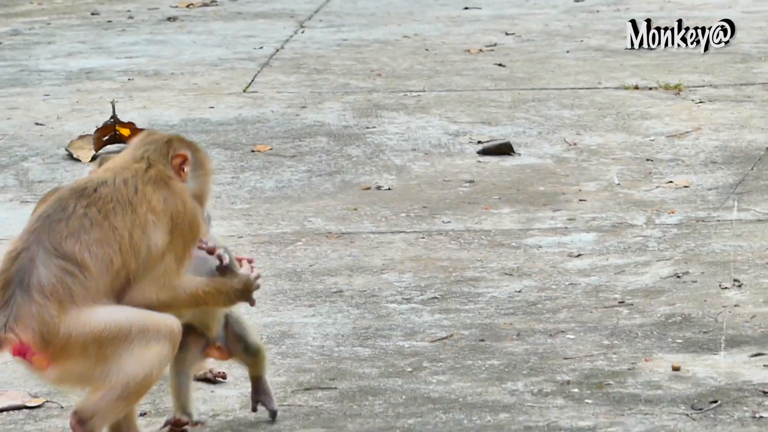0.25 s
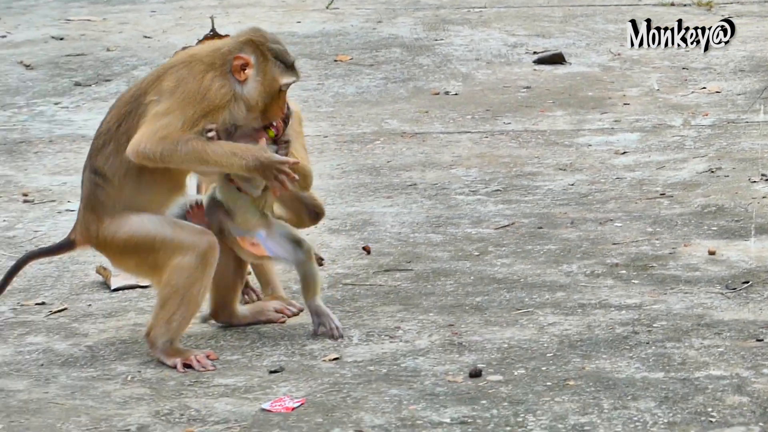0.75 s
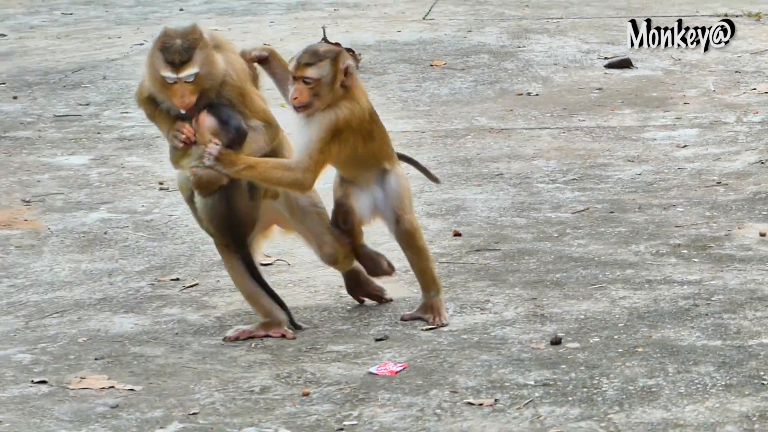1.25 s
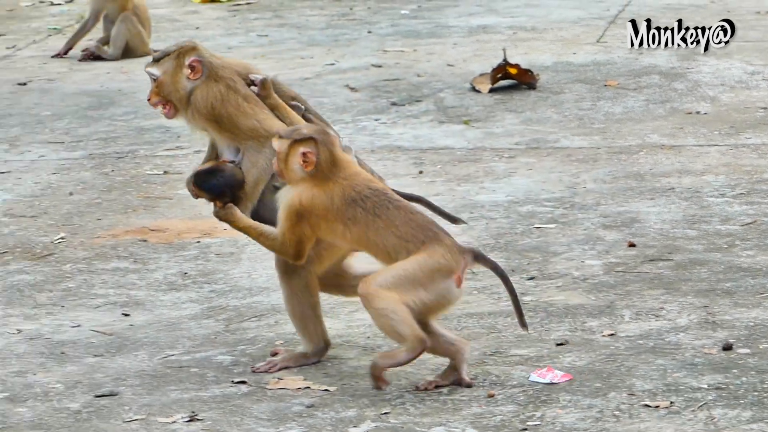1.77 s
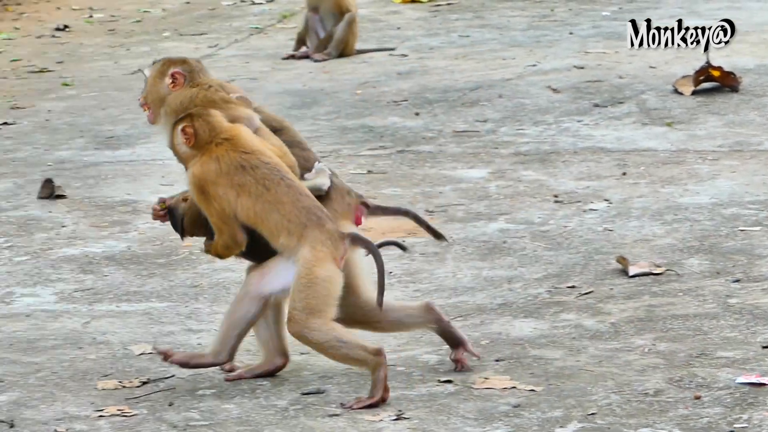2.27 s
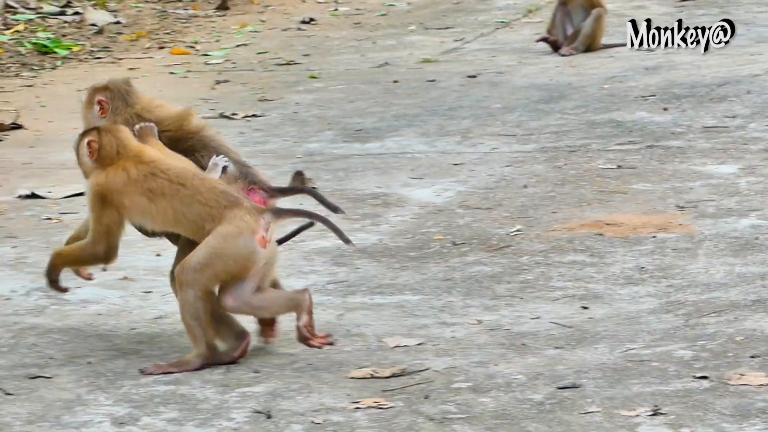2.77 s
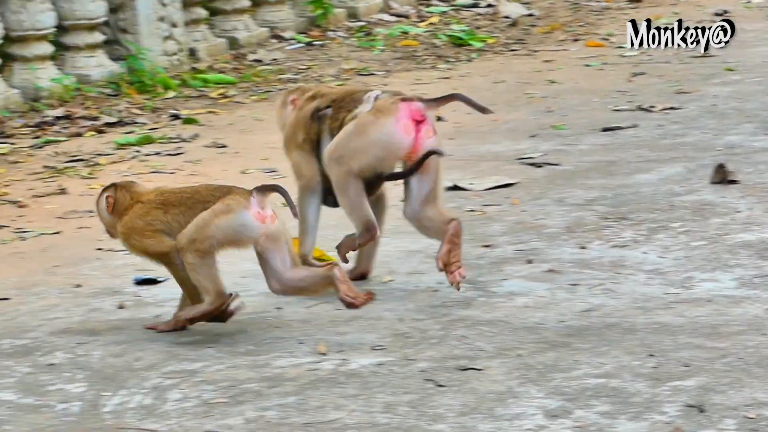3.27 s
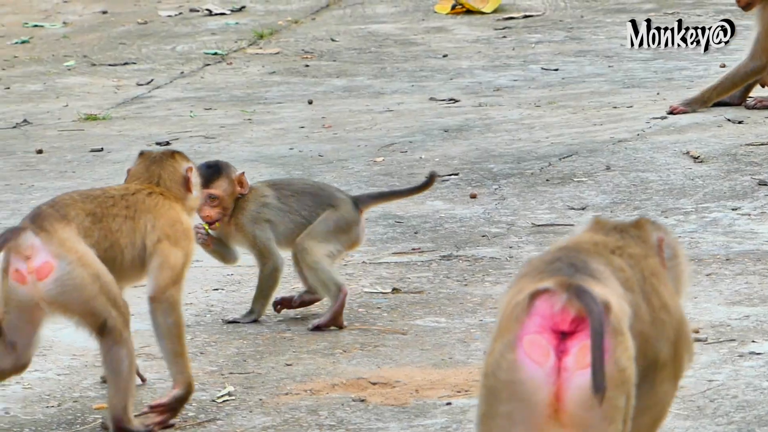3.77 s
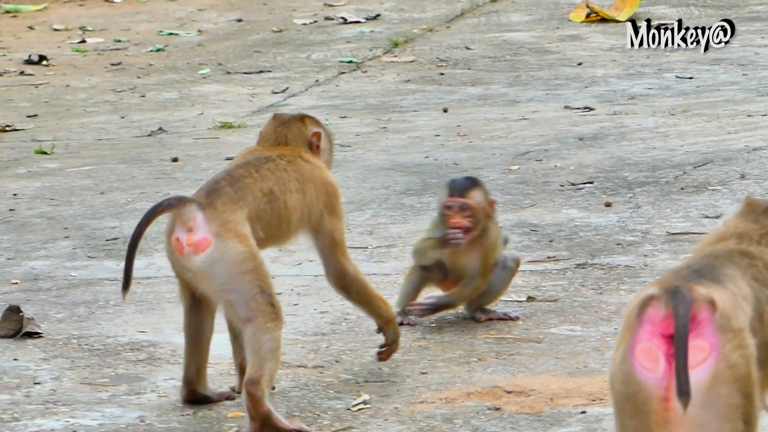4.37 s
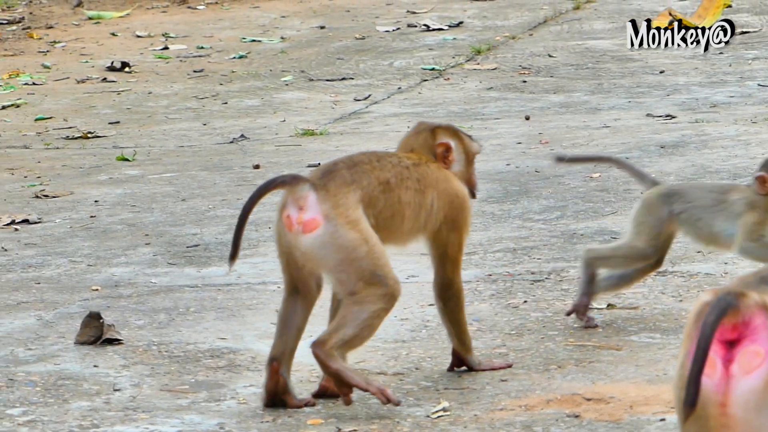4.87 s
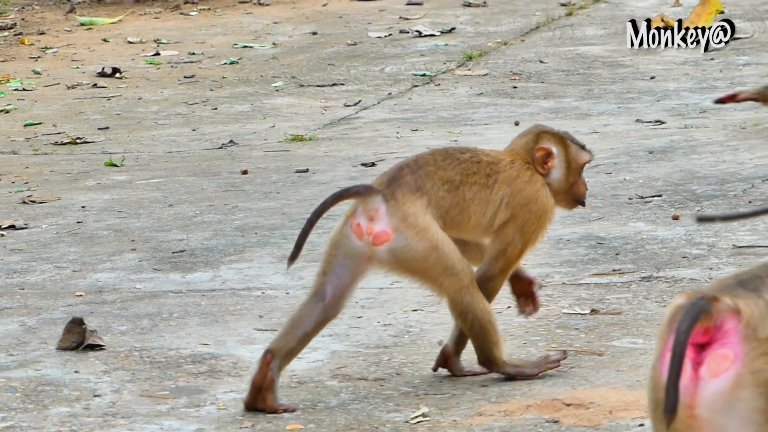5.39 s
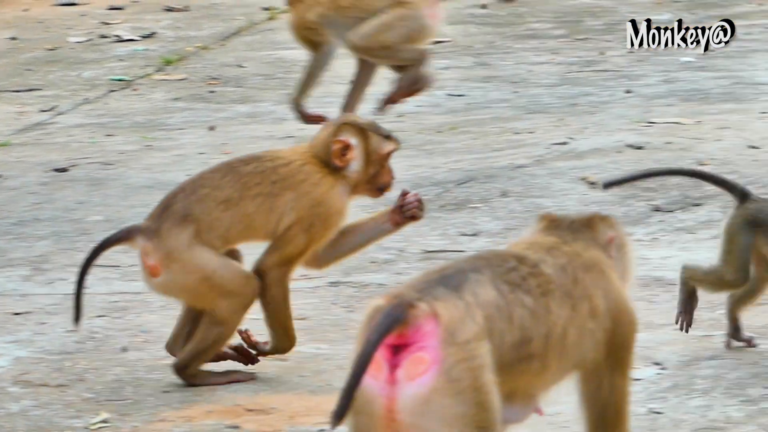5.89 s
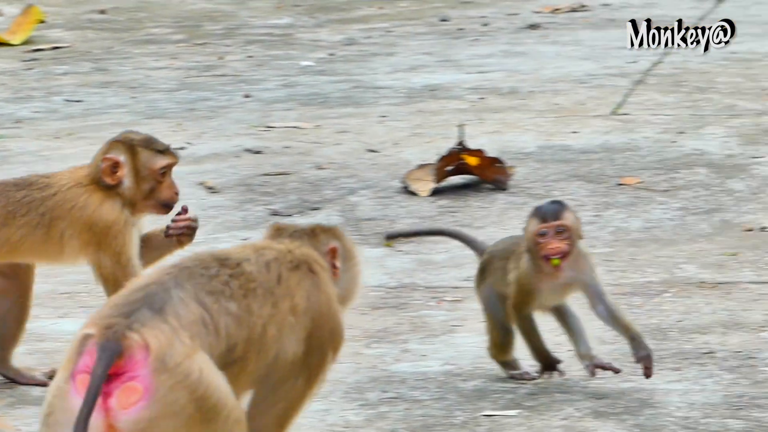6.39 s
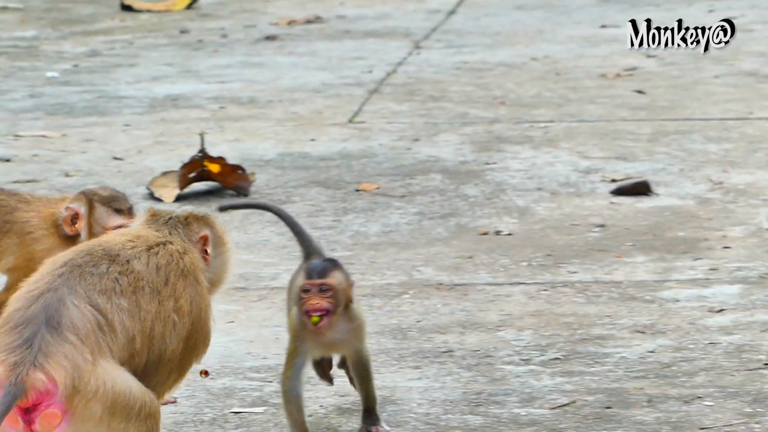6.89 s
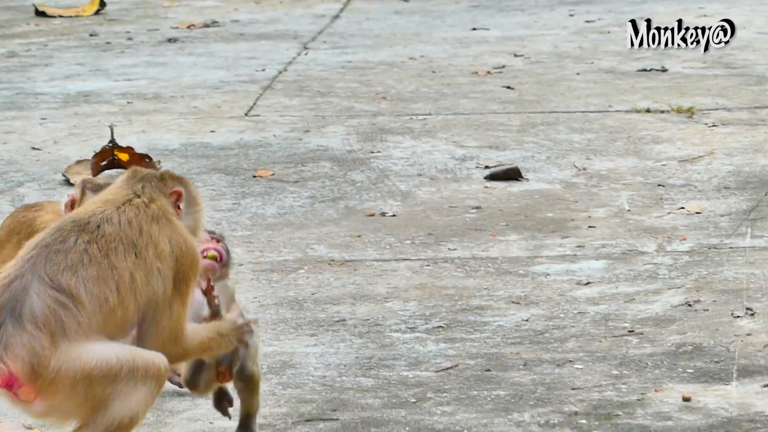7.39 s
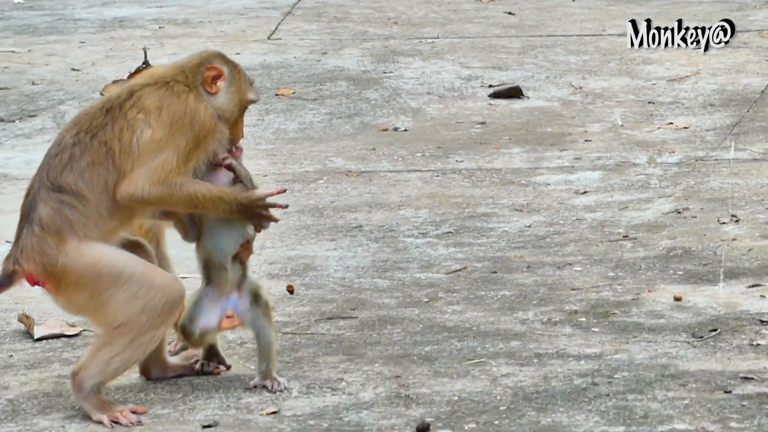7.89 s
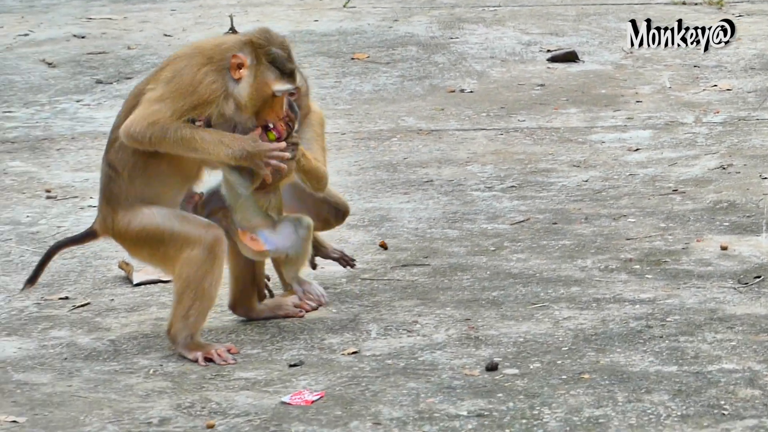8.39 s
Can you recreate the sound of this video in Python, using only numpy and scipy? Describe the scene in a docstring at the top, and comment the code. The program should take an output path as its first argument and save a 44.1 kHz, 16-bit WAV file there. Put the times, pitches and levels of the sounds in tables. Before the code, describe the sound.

Outdoors on concrete, dull thumps knock the microphone as a baby monkey gives a loud, breaking, falling scream, then three more short shrill cries and a faint distant one. Light gritty scuffs follow over low rumble and motor hum. A sudden cut brings quieter, slowed sound a fifth lower: three clean whistled squeals, then the bumps and rough screams again, stretched.

```python
"""A baby macaque screams on a concrete yard as older monkeys grab it and run off: vocal-fold partials lose
their regularity, are filtered by throat and mouth, bounce off the ground and reverberate in the yard.
Feet scuff as bursts of filtered noise, bumps rock the microphone as short damped tones, and a far motor
hums as wavering sines over noise. The action plays at true speed, then slowed and quieter from an earlier
start, so three clean squeals from before the grab are heard only in the slow replay."""
import sys
import numpy as np
from scipy import signal
from scipy.fft import rfft, irfft, next_fast_len
from scipy.io import wavfile
from scipy.ndimage import uniform_filter1d

SR = 44100
rng = np.random.default_rng(int(sys.argv[2]) if len(sys.argv) > 2 else 0)


def output_pcm(signal):
    """Save a mono or channel-first signal as 16-bit PCM at the path in sys.argv[1].

    Samples are clipped to [-1, 1] before scaling.
    """
    pcm = np.clip(np.atleast_2d(signal).T, -1, 1) * 32767
    wavfile.write(sys.argv[1], SR, np.round(pcm).astype(np.int16))


N = 381461

CUT_S, LEAD_S = 3.54, 2.39983   # the replay begins at the cut; it shows this much earlier action
SLOWDOWN, REPLAY_DB = 1.5, -11.9
CUTOFF_HZ = 9600
TIME = np.arange(int((LEAD_S + CUT_S) * SR)) / SR - LEAD_S   # action clock [s]; the lead-in is negative


def from_db(db):
    """Level to amplitude ratio: 20 dB is a factor of ten."""
    return 10 ** (np.asarray(db) / 20)


def rms_one(x):
    """Normalization to unit mean-square power."""
    return x / np.sqrt(np.mean(x ** 2) + 1e-20)


def read_table(points, hz):
    """Linear interpolation on a logarithmic frequency axis."""
    f, value = np.transpose(points)
    return np.interp(np.log(hz + 1e-9), np.log(f), value)


def colour(x, spectrum):
    """Linear filtering: a spectrum is multiplied by a gain that falls a further 20 dB/octave past its ends."""
    size = next_fast_len(x.shape[-1] + 1024)
    hz = np.maximum(np.arange(size // 2 + 1) * SR / size, 1)
    octaves_outside = np.abs(np.log2(hz / np.clip(hz, spectrum[0][0], spectrum[-1][0])))
    gain = from_db(read_table(spectrum, hz) - 20 * octaves_outside)
    return irfft(rfft(x, size) * gain, size)[..., :x.shape[-1]]


def wobble(hz, size):
    """Band-limited random modulation: low-passed Gaussian noise of unit spread."""
    spectrum = rfft(rng.standard_normal(next_fast_len(size + SR // 4)))
    f = np.linspace(0, SR / 2, len(spectrum))
    return rms_one(irfft(spectrum / (1 + (f / hz) ** 6)))[:size]


# Interchannel correlation of a diffuse field: (frequency [Hz], correlation [-1 to 1])
CHANNEL_CORRELATION = [(50, 0.93), (150, 0.76), (300, 0.5), (800, 0.35), (2000, 0.7), (3500, 0.88),
                       (8000, 0.2)]


def stereo_noise(size):
    """Diffuse field: shared and opposed noise are weighted to set the interchannel correlation."""
    padded = next_fast_len(size)
    mid, side = rfft(rng.standard_normal((2, padded)))
    alike = np.clip(read_table(CHANNEL_CORRELATION, np.linspace(0, SR / 2, len(mid))), -1, 1)
    shared = np.sqrt(1 + alike) * mid
    opposed = np.sqrt(1 - alike) * side * [[1], [-1]]
    return irfft(shared + opposed, padded)[:, :size] / np.sqrt(2)


def add(track, sound, s):
    """Superposition: sound pressures sum, here from a given action time."""
    start = max(int((s + LEAD_S) * SR), 0)
    track[:, start:start + sound.shape[-1]] += sound[..., :max(track.shape[1] - start, 0)]


def action_time(replay_s):
    """Time scaling: the moment of the action that sounds at a time of the replay."""
    return (replay_s - CUT_S) / SLOWDOWN - LEAD_S


def low_pass(x):
    """Band limitation by a steep elliptic filter."""
    return signal.sosfilt(signal.ellip(12, .1, 80, CUTOFF_HZ, fs=SR, output="sos"), x)


# Noise spectra of low rumble, drone and outdoor hiss: (frequency [Hz], relative level [dB])
RUMBLE_SPECTRUM = [(15, -53.5), (25, -21), (44, -5), (81, 1), (150, -1), (182, 0), (252, -5.5),
                   (330, -12.5), (430, -35), (730, -120)]
DRONE_SPECTRUM = [(140, -30.5), (230, -14), (308, -1.5), (470, 0), (796, -12), (914, -11), (1060, -18),
                  (1600, -31), (2080, -60.5), (3520, -120)]
AIR_SPECTRUM = [(700, 5.5), (1300, 4.5), (2500, 0.5), (4000, -2.5), (5200, -6.5), (6600, -3), (7700, -7.5),
                (9500, -15)]
# Tonal lines of the far motor: (frequency [Hz], RMS level before panning [dB])
MOTOR_LINES = [(78, -59.5), (138, -61), (177.6, -55.5)]
# Rumble swells while the microphone is jostled: (middle [s], width [s], gain [dB])
JOSTLE_SWELLS = [(0.021, 0.13, 13.5), (3.4, 0.052, 1)]
RUMBLE_DB, DRONE_DB = -47, -53
# One lull: the noise drops at once and creeps back.
LULL_REPLAY_S, RECOVERY_S = 6.1, 1.6   # onset on the replay clock; decay time on the action clock
RUMBLE_DIP_DB, DRONE_DIP_DB = 5, 9


def background(air_db=-57.0, air_dip_db=3, hum_waver=.014, rumble_pan_db=0.1, motor_pan_db=2):
    """Tones in noise: frequency-modulated motor lines over coloured noise that sinks in an exponential lull."""
    size, since = len(TIME), TIME - action_time(LULL_REPLAY_S)
    lull = np.clip(since / 0.014, 0, 1) * np.exp(-np.maximum(since, 0) / RECOVERY_S)
    jostle_db = sum(db * np.exp(-((TIME - s) / width) ** 2) for s, width, db in JOSTLE_SWELLS)
    rumble_db = RUMBLE_DB - RUMBLE_DIP_DB * lull + jostle_db
    rumble = rms_one(colour(stereo_noise(size), RUMBLE_SPECTRUM)) * from_db(rumble_db)
    drone = rms_one(colour(stereo_noise(size), DRONE_SPECTRUM)) * from_db(DRONE_DB - DRONE_DIP_DB * lull)
    air = rms_one(colour(stereo_noise(size), AIR_SPECTRUM)) * from_db(air_db - air_dip_db * lull)
    # one common speed, so that all motor lines waver together
    turned_s = np.cumsum(1 + hum_waver * wobble(10.4, size)) / SR
    hum = sum(np.sqrt(2) * from_db(db) * np.sin(2 * np.pi * hz * turned_s) for hz, db in MOTOR_LINES)
    rumble = rumble * from_db([[-rumble_pan_db], [rumble_pan_db]])
    motor = (drone + hum) * from_db([[-motor_pan_db], [motor_pan_db]])
    return rumble + motor + air


# Dull bumps on the microphone: (time of strongest swing [s], envelope peak before panning [dB], frequency [Hz])
MICROPHONE_BUMPS = [(0.004, -24.5, 135), (0.052, -35, 144), (0.078, -20, 111), (0.096, -20, 137),
                    (3.32, -36, 104), (3.349, -33.5, 135), (3.388, -39, 102), (3.456, -29, 104)]


def bumps(cycles=0.72, skew_rad=.45, pan_db=2.7):
    """Heavily damped oscillation: a bump rocks the microphone briefly, its two sides out of phase."""
    out, t, sides = np.zeros((2, len(TIME))), np.arange(SR // 8) / SR, np.array([[-1], [1]])
    for s, peak_db, hz in MICROPHONE_BUMPS:
        swell = t * hz / cycles   # reaches 1 at the envelope peak
        swing = np.sin(2 * np.pi * hz * t + rng.uniform(0, 2 * np.pi) + skew_rad * sides)
        thud = swing * swell ** 2 * np.exp(1 - swell ** 2)
        add(out, thud * from_db(peak_db + pan_db * sides), s - cycles / hz)
    return out


# Feet and hands on gritty concrete: (time [s], level [dB], decay time [s], spectral peak [Hz])
GRIT_SCUFFS = [(1.696, -50, 0.015, 5500), (1.711, -52.5, .015, 5450), (2.442, -40, 0.0046, 1530),
               (2.447, -52, 0.016, 5450), (2.917, -53, 0.019, 800), (2.99, -48, 0.041, 5630),
               (3.143, -49.5, 0.011, 2200), (3.193, -53.5, 0.064, 5200), (3.46, -56, 0.025, 5000)]


def scuffs(grain_db=3, attack_s=0.00082, skirt_db=-12):
    """Friction noise: grit gives decaying bursts of granular noise, dull for a slap, bright for a slide."""
    out, t = np.zeros((2, len(TIME))), np.arange(SR // 5) / SR
    for s, level_db, length, hz in GRIT_SCUFFS:
        grit = stereo_noise(len(t)) * from_db(grain_db * wobble(550, len(t)))
        grit = rms_one(colour(grit, [(hz / 3, skirt_db), (hz, 0), (hz * 3, skirt_db)]))
        burst = np.minimum(t / attack_s, 1) * np.exp(-t / max(length, .002))
        add(out, grit * from_db(level_db) * burst, s)
    return out


# Reverberation of the yard: (frequency [Hz], time to decay by 60 dB [s])
YARD_DECAY = [(500, 0.33), (2500, 0.92), (5000, 0.96), (9000, 0.5)]
# Distinct far wall: (delay [s], level against the whole diffuse echo [dB])
WALL_ECHOES = [(0.17, -19)]


def yard_echo(first_s=0.0038, build_s=0.0087, early_db=5, early_s=0.027):
    """Reverberation: trees and buildings return a dense tail decaying band by band; a far wall adds an echo."""
    t, out = np.arange(SR) / SR, 0
    edges = np.geomspace(600, 11000, num=8)
    for low, high in zip(edges, edges[1:]):
        band_filter = signal.butter(2, [low, high], "band", fs=SR, output="sos")
        band = signal.sosfilt(band_filter, stereo_noise(SR))
        decay_s = read_table(YARD_DECAY, np.sqrt(low * high))
        out = out + band * np.exp(-np.log(1000) * t / decay_s)
    build_up = np.clip((t - first_s) / build_s, 0, 1)
    early_boost = 1 + from_db(early_db) * np.exp(-t / early_s)
    out = out * build_up * early_boost
    out = out / np.sqrt(np.sum(out ** 2))
    for delay, db in WALL_ECHOES:
        out[:, int(delay * SR)] += from_db(db)
    return out


def heard(voice, yard, echo_db, ground_ms, ground_db, pan_db=0.74):
    """Propagation by several paths: direct, ground and yard sound add; the ground path combs the spectrum."""
    n = np.arange(len(voice))
    # the comb makes a call swell and dip as its pitch moves
    bounce = np.interp(n - ground_ms * SR / 1000, n, voice, left=0)
    direct = voice + from_db(ground_db) * bounce
    out = from_db(echo_db) * signal.fftconvolve(yard, voice[None], axes=1)
    return out + np.pad(direct, (0, out.shape[1] - len(n))) * from_db([[-pan_db], [pan_db]])


def envelope(t, attack_s, release_s):
    """Amplitude envelope: quarter-sine attack, hold, linear release."""
    return np.sin(np.pi / 2 * np.clip(t / attack_s, 0, 1)) * np.clip((t[-1] - t) / release_s, 0, 1)


# Resonances of throat and open mouth: (frequency [Hz], gain [dB])
THROAT_RESPONSE = [(1050, -36.5), (1320, -12.5), (1600, 3), (2300, 1), (3000, 1), (3600, -2), (4050, -6),
                   (4800, -5.5), (5900, 1), (7400, -5), (8100, -6.5), (8600, -17), (9300, -15.5)]
# Partials of a four-cycle fold pattern: (multiple of the pitch [ratio], level before scaling [dB])
SUBHARMONICS = [(.5, -26.5), (.75, -5.5), (1.25, -2), (1.5, -2), (2.5, -9.5), (4.5, -14)]


def cry(pitch, chaos, quadrupling, octave_db, third_db, rasp_db, tremor,
        lurch=.04, smear_hz=170, flutter_db=4.0, uneven_db=4.0):
    """Source-filter voice: harmonics, four-cycle subharmonics and chaos excite the throat; level is evened."""
    chaos, size = np.clip(chaos, 0, 1), len(pitch)
    unsteady_pitch = pitch * (1 + (tremor + lurch * chaos) * wobble(150, size))
    phase = 2 * np.pi * np.cumsum(unsteady_pitch) / SR
    harmonics, folds = {1: 1, 2: from_db(octave_db), 3: from_db(third_db)}, 0
    for multiple in np.arange(2, 19) / 4:
        if multiple in harmonics:
            strength = harmonics[multiple]
        else:
            partial_db = read_table(SUBHARMONICS, multiple) + uneven_db * wobble(23, size)
            strength = quadrupling * from_db(partial_db)
        # in chaos every partial strays from its place and flutters by itself
        stray_hz = smear_hz * np.sqrt(multiple) * chaos * wobble(300, size)
        stray = 2 * np.pi * np.cumsum(stray_hz) / SR
        flutter = from_db(flutter_db * chaos * wobble(250, size))
        folds = folds + strength * flutter * np.cos(multiple * phase + stray)
    # air torn up once a cycle adds a thin hiss above the pitch
    hiss = colour(rng.standard_normal(size), [(3300, -8.0), (5000, 5), (9500, -7.5)])
    rasp = rms_one(hiss) * (1 + 0.34 * np.cos(phase))
    voice = colour(folds + from_db(rasp_db) * np.sqrt(chaos) * rasp, THROAT_RESPONSE)
    return voice / np.sqrt(uniform_filter1d(voice ** 2, size=600) + 1e-12)


SQUEAL_CHAOS = .02   # 0-1, once opened
SQUEAL_RELEASE_S, GLIDE_S = .007, .009   # final fade; the pitch rounds its turns over the glide
PURE_ONSET_DB, OPENING_S = -11.5, .025   # overtone cut at either end; overtone and rasp open over this time


def squeal(contour, level_db, attack, sag, octave_db, rasp_db):
    """Near-periodic phonation: a held whistle whose overtone and rasp grow as it opens and fade as it ends."""
    s, hz = np.transpose(contour)
    s = (s - s[0]) / SLOWDOWN
    t = np.arange(0, s[-1] + SQUEAL_RELEASE_S / 2, 1 / SR)
    true_pitch = np.interp(t, s, hz * SLOWDOWN)
    pitch = uniform_filter1d(true_pitch, size=max(int(GLIDE_S * SR), 1), mode="nearest")
    opened = np.clip(np.minimum(t, t[-1] - t) / OPENING_S, 0, 1)
    overtone_db = octave_db + PURE_ONSET_DB * (1 - opened)
    voice = cry(pitch, SQUEAL_CHAOS * opened ** 2, 0, overtone_db, third_db=-22.5,
                rasp_db=rasp_db, tremor=.0065)
    return voice * from_db(level_db + sag * t) * envelope(t, attack, SQUEAL_RELEASE_S)


BREAK_S, RELEASE_S = .007, 0.033   # time for the folds to break up; final fade
PUSH_EARLY_S, PUSH_S = .009, .004   # the push to full strength: lead before the top; suddenness


def scream(length, level_db, soft_db, sag, rise, fall, onset_hz, top_hz, end_hz, chaos, quadrupling,
           shudder_db=1.3):
    """Nonlinear phonation: a soft rising whistle is pushed, breaks at its top and falls rough and shuddering."""
    t = np.arange(int(length * SR)) / SR
    past_top = np.maximum(t - rise, 0)
    climb = np.sin(np.pi / 2 * np.clip(t / rise, 0, 1)) ** 2
    slide = np.sin(np.pi / 2 * np.clip(past_top / fall, 0, 1)) ** 2
    pitch = onset_hz + (top_hz - onset_hz) * climb + (end_hz - top_hz) * slide
    unpushed = .5 - .5 * np.tanh((t - rise + PUSH_EARLY_S) / PUSH_S)
    broken = 1 - np.exp(-(past_top / BREAK_S) ** 2)
    voice = cry(pitch, chaos * broken, quadrupling * broken, octave_db=-12, third_db=-15.5,
                rasp_db=-13.5, tremor=.006)
    shudder = shudder_db * chaos * broken * wobble(120, len(t))
    course_db = level_db + soft_db * unpushed + sag * past_top + shudder
    return voice * from_db(course_db) * envelope(t, .011, RELEASE_S)


# Screams, each one pitch arch: (start [s], length [s], level [dB], soft-start offset [dB],
#   level slope past the top [dB/s], rise [s], fall [s], onset pitch [Hz], top pitch [Hz], end pitch [Hz],
#   chaos [0-1], period quadrupling [0-1], echo gain [dB], ground-path delay [ms])
SCREAM_ARCHES = [ (0.086, 0.19, -22, -10.5, -87.5, .026, 0.18, 2050, 2940, 1449, .45, 0.47, -5.5, 1.39),
                 (.767, .11, -27, -4.5, -40, 0.041, 0.031, 3420, 3514, 3057, .2, 0.41, -8.5, 1.62),
                 (0.967, 0.13, -25, -14, -72.5, .023, 0.085, 2434, 3069, 2250, 0.39, 0.57, -9, 1.64),
                 (1.26, 0.21, -33, -9, 29.5, .024, .044, 2826, 3100, 1853, .72, 0.96, -3, 0.54),
                 (2.14, 0.12, -45, 0, -14, 0.0088, 0.12, 2680, 2730, 1960, 0.17, 0.11, 4.5, 1.85)]
# Squeals at true speed: (level [dB], attack [s], level slope [dB/s], octave overtone [dB], rasp [dB],
#   echo gain [dB], ground-path gain [dB])
SQUEAL_SHAPES = [(-32, .005, -2, -6, -4.5, -3, -7), (-28, 0.0042, -27, -5, -8, -6, -4.5),
                 (-22.5, 0.026, -19, -11, -26, -11.5, -12)]
# Pitch of each squeal as it sounds in the slow replay: (time [s], pitch [Hz])
SQUEAL_CONTOURS = [
    [(4.04, 2183), (4.105, 2010), (4.14, 1985), (4.165, 2131), (4.225, 2153), (4.3, 2079)],
    [(4.655, 2140), (4.675, 2320), (4.7, 2405), (4.755, 2230), (4.782, 2397), (4.85, 2327), (4.87, 2180)],
    [(6.71, 2020), (6.748, 2286), (6.79, 2215), (6.835, 2176), (6.92, 1936)],
]
# Ground-path delay of each squeal at true speed: (delay [ms])
SQUEAL_BOUNCES = [2.53, 2.08, 3.27]
SCREAM_GROUND_DB = -13.5   # bounce off the concrete


def baby():
    """Direct-to-reverberant balance: three squeals, then five screams; more echo when the baby faces away."""
    out, yard = np.zeros((2, len(TIME))), yard_echo()
    for start, *shape, echo_db, ground_ms in SCREAM_ARCHES:
        add(out, heard(scream(*shape), yard, echo_db, ground_ms, SCREAM_GROUND_DB), start)
    for contour, settings, ground_ms in zip(SQUEAL_CONTOURS, SQUEAL_SHAPES, SQUEAL_BOUNCES):
        *shape, echo_db, ground_db = settings
        call = heard(squeal(contour, *shape), yard, echo_db, ground_ms, ground_db)
        add(out, call, action_time(contour[0][0]))
    return out


def scene():
    """Time-frequency scaling: true speed, then a hard cut to the slow replay, every pitch a fifth lower."""
    action = low_pass(baby() + scuffs() + bumps() + background())
    live = action[:, int(LEAD_S * SR):]
    slowed = signal.resample_poly(action, round(2 * SLOWDOWN), 2, axis=1)
    return np.concatenate([live, from_db(REPLAY_DB) * slowed], axis=1)[:, :N]


def record(dry):
    """Band limitation: the top of the spectrum is cut."""
    return low_pass(dry)


dry = scene()
out = record(dry)
output_pcm(out)
```